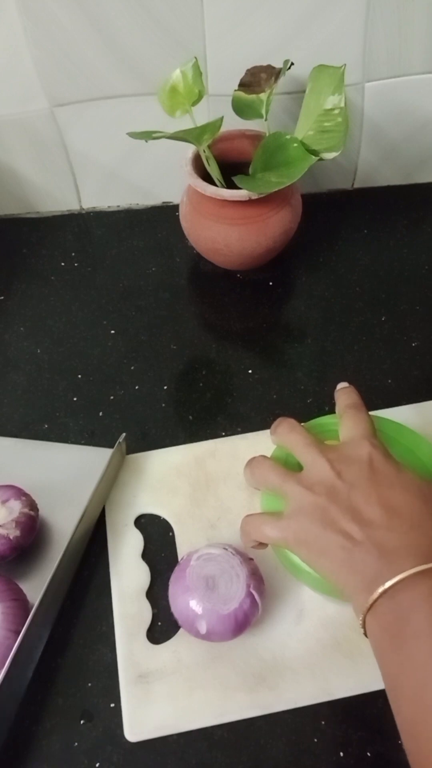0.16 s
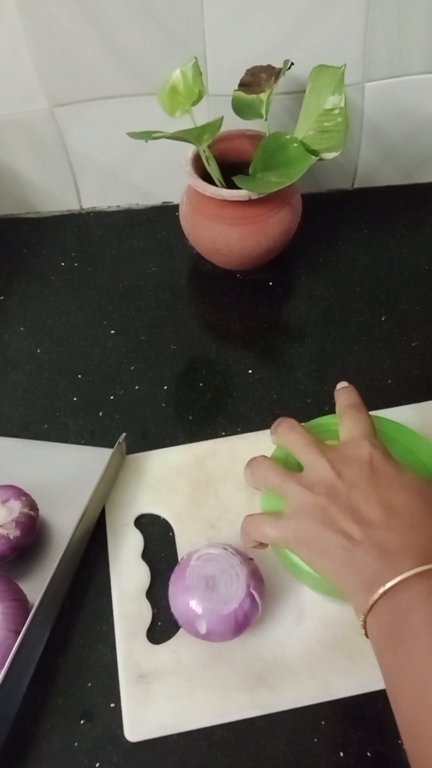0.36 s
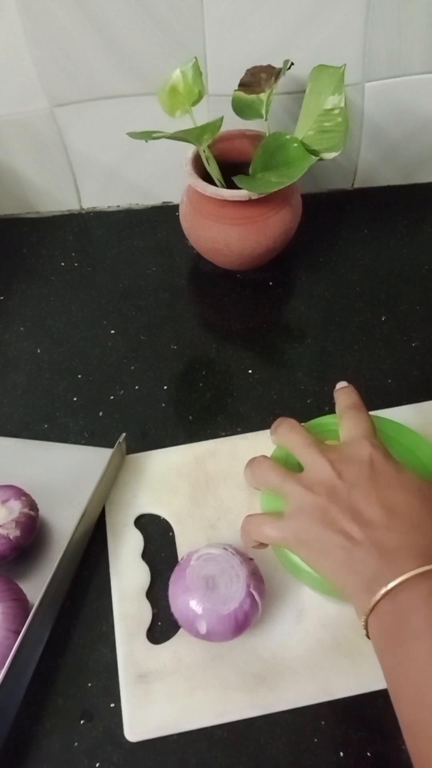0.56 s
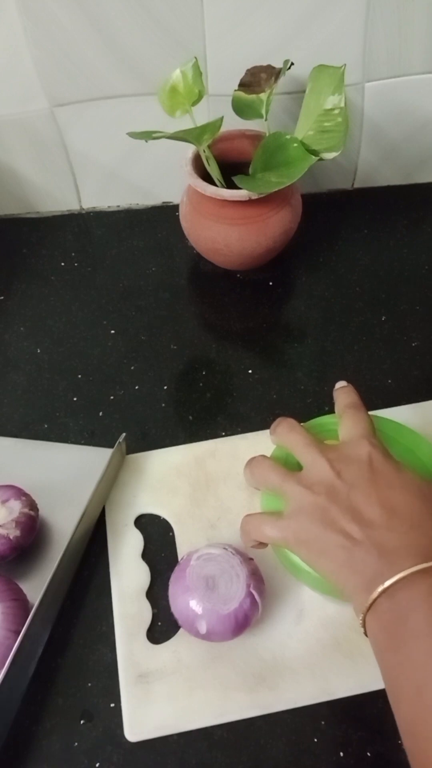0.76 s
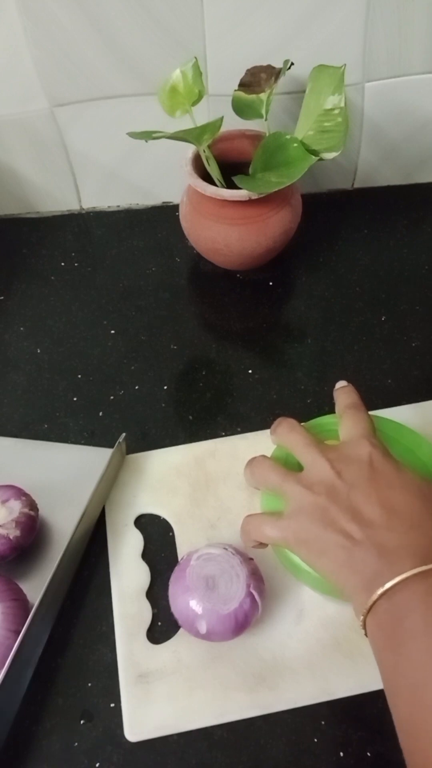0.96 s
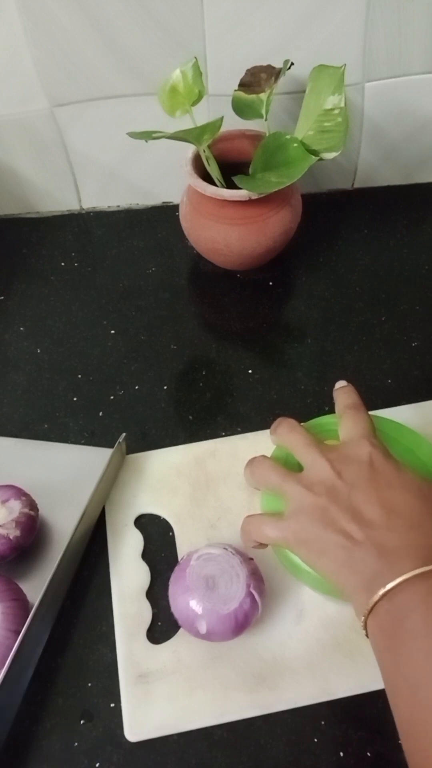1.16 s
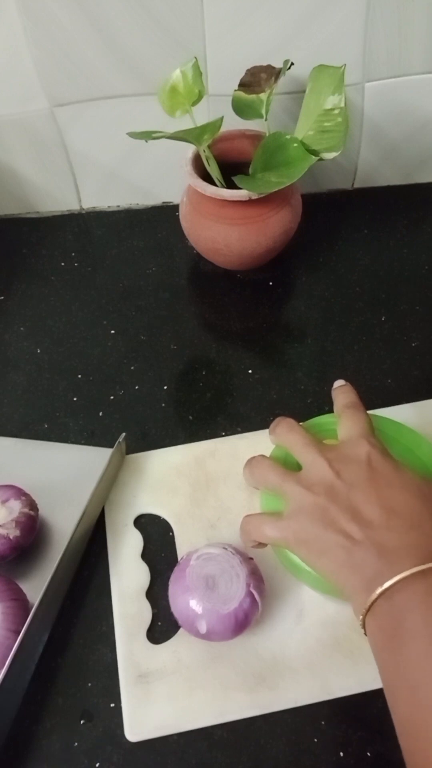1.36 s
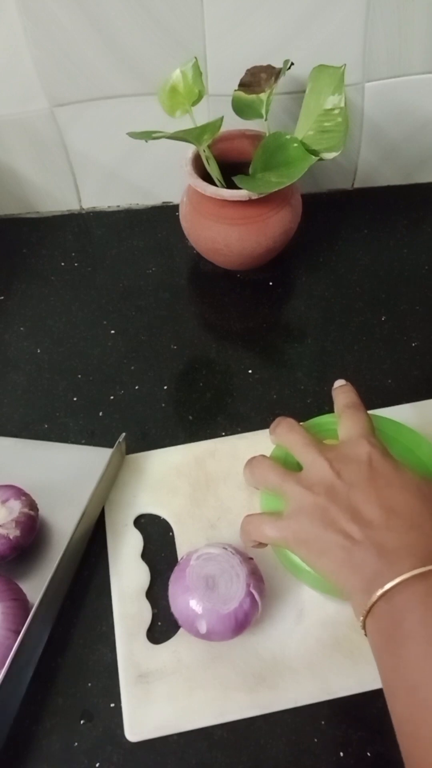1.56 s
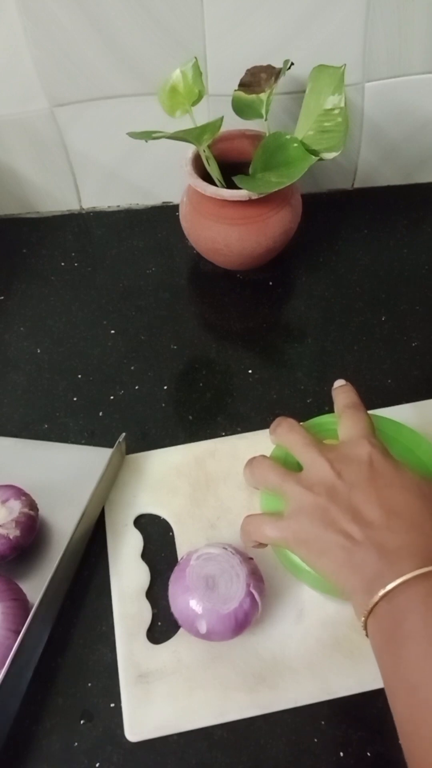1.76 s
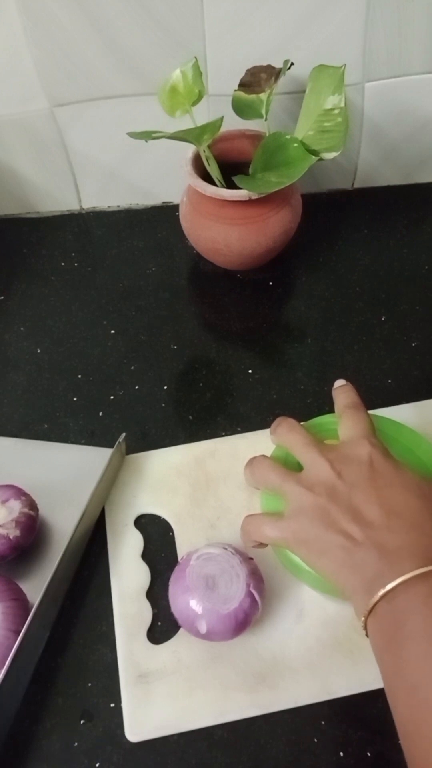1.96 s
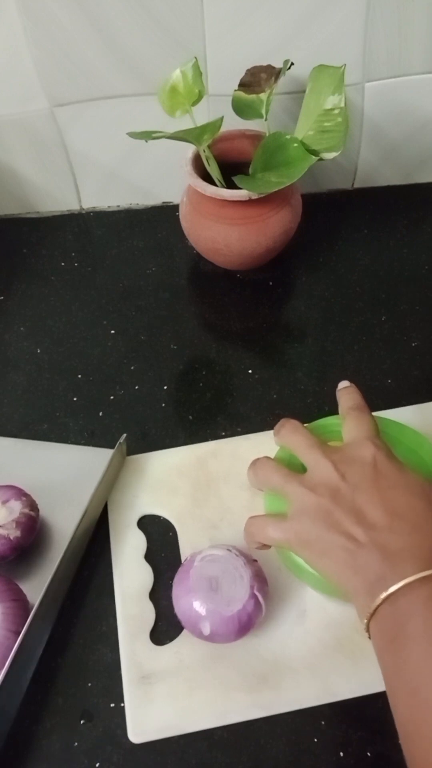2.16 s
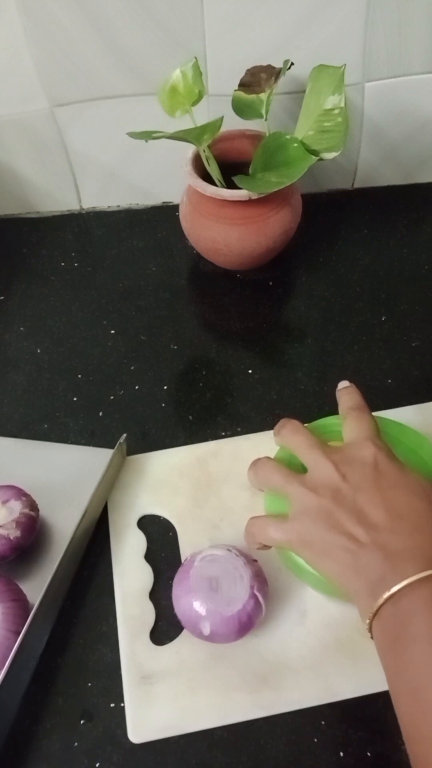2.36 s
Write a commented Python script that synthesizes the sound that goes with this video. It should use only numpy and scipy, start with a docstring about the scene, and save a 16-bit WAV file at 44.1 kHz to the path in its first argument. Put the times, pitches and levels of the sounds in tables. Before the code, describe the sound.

A pull-cord vegetable chopper crunches through onion four times in a steady rhythm. Each pull starts with a clack, pieces rattle against the plastic bowl, then the cord hisses back in. It sounds close, in a quiet kitchen.

```python
"""Bursts of crunching and rattling, one every 0.6 s: a pull-cord vegetable chopper in a tiled kitchen.
The drive catches with a clack, the blades spin up and fling onion pieces against the plastic bowl,
then the spring draws the cord back in with a hiss while the blades run down.
The chopper bumps softly on its board, over faint room noise."""
import sys
import numpy as np
from scipy import signal
from scipy.fft import rfft, irfft
from scipy.io import wavfile

SR = 44100
rng = np.random.default_rng(int(sys.argv[2]) if len(sys.argv) > 2 else 0)


def store_pcm(level_fs):
    """Save levels as 16-bit WAV."""
    pcm = np.round(np.clip(level_fs, -1, 1) * 32767).astype(np.int16)
    wavfile.write(sys.argv[1], SR, np.atleast_2d(pcm).T)


N = 110250
T = np.arange(N) / SR

# Each row: pull start in s, pull level in dB, pull length as a share of the usual,
# cord return level in dB, wait until the return in s, rise of the return in s.
STROKES = [(-.45, -4, 1.03, 1.5, 0.32, .02), (0.149, -1, 0.99, -1, 0.34, .002),
           (0.759, .5, 1.03, 3.5, 0.31, 0.024), (1.359, 0, 0.97, 2, 0.32, .002),
           (1.959, -2.5, 0.99, -2, 0.31, 0.055)]
# Spectra of a knock on plastic and of cord friction. Each row: frequency in Hz, relative level in dB.
KNOCK_SPECTRUM = [(30, -34), (55, -35), (95, -24.5), (125, -14.5), (180, -9.5), (350, -4), (750, 1),
                  (1500, -2.5), (2200, -10.5), (3000, -13), (3750, -17.5), (4300, -32), (4850, -37.5),
                  (7000, -35.5), (15500, -55.5)]
CORD_SPECTRUM = [(60, -23), (150, -5), (400, 3.5), (750, 1), (1250, 2), (1700, 4), (2300, -0.5),
                 (3200, -0.5), (4000, -10), (4950, -22.5), (6000, -10), (7400, 1), (8500, -0.5), (9300, -6),
                 (10900, -2), (13000, -10.5), (14000, -12), (15500, -9.5)]


def chopping():
    """Onion is cut and pelts the wall in bursts as the blades pass, over a swirl of wet mince."""
    # Force through one pull. Each row: time into the pull in s, level in dB.
    pull_shape = [(0, -19.5), (.035, -16), (.07, -7.5), (.105, -7), (.135, -2), (.205, -6), (.26, -12),
                  (.31, -19.5), (.40, -24), (.52, -25.5), (.58, -36)]
    # Big pieces hit the wall. Each row: time in s, relative level in dB.
    wall_knocks = [(.257, -1.5), (.278, -4.5), (.298, -2.5), (.345, -4), (.366, -8), (.813, -9),
                   (.828, -10), (.864, -2), (.881, -7.5), (.889, -7.5), (.898, 0), (1.425, -6),
                   (1.471, -6.5), (1.490, -6), (1.506, -5), (1.548, -6.5), (2.031, -13.5), (2.051, -7.5),
                   (2.097, -6.5), (2.131, -4.5), (2.150, -9.5)]
    # Each row: frequency in Hz, relative level in dB.
    crunch_spectrum = [(1000, -28), (3500, -4.5), (4500, -12), (4900, -8), (5600, 0.5), (7100, 9.5),
                       (8600, 1.5), (9300, -1), (10200, 1.5), (14000, -10.5), (15500, -6)]
    blade_hz, blade_depth = 49, 0.32
    force = sum(from_db(db) * gesture(pull_shape, s, stretch) for s, db, stretch, *_ in STROKES)
    passes = 1 + blade_depth * np.sin(2 * np.pi * (blade_hz * T + rng.random()))
    pieces = from_db(-34.5) * force * passes * grains(per_s=700, spread_db=4)
    mince = from_db(-36) * force ** 0.93 * rng.standard_normal(N)
    hits = kitchen(pieces + mince)
    knocks = kitchen(from_db(-4.5) * bursts(wall_knocks, decay_s=0.0031))
    # Faster blades cut more crisply; onion layers snap mostly at full speed.
    cuts = from_db(-17.5) * (hits + from_db(0.5) * knocks) * force ** 0.1
    snaps = kitchen(from_db(-53.5) * force ** 1.7 * grains(per_s=150, spread_db=9))
    return bowl(hits + knocks) + colour(cuts + snaps, crunch_spectrum)


def pawl():
    """The drive's pawl catches with a tick, knocks the bowl and rebounds once."""
    # Each row: time in s, knock level in dB.
    catches = [(0.149, -23), (0.756, -26), (1.361, -13), (1.960, -17.5)]
    rebound_s, rebound_db, tick_db = 0.005, -2.5, -31
    rebounds = [(s + rebound_s, db + rebound_db) for s, db in catches]
    hits = bursts(catches + rebounds, decay_s=0.0024)
    ticks = bursts([(s, tick_db) for s, _ in catches], decay_s=0.003)
    return bowl(kitchen(hits)) + colour(kitchen(ticks), CORD_SPECTRUM)


def bowl(hits):
    """Each hit gives a short plastic knock and rings the modes with strengths of its own."""
    # Modes of bowl and board. Each row: frequency in Hz, relative level in dB, T60 in s.
    modes = [(264, -17, .22), (413, -10, .1), (555, -8, .1), (608, -4, .11), (735, 0, .13), (840, -2, .06),
             (1042, -2, .07), (1239, -4, .1), (1508, -5, .1), (1553, -2, .11), (1645, -2, .05),
             (1880, -6, .045), (2680, -11, .04)]
    ring_db, scatter_db = -36, 2.5
    rings = np.zeros(N)
    for hz, db, t60_s in modes:
        strength = from_db(ring_db + db + scatter_db * rng.standard_normal(N))
        rings += ring(hits * strength, hz, t60_s)
    return colour(hits, KNOCK_SPECTRUM) + butterworth(rings, "high", hz=345, order=2)


def cord():
    """The cord rubs through its eyelet as the spring winds it back, rasping where it snags."""
    # Cord speed. Each row: time into the return in s, level in dB.
    return_shape = [(0, -10), (.05, -5.5), (.11, -2), (.19, -6), (.23, -16.5), (.27, -17), (.34, -16.5)]
    # Each row: centre in s, Gaussian width in s, level in dB.
    snags = [(0.038, .008, -48), (0.485, .002, -52), (0.514, 0.0022, -47), (0.587, 0.0069, -45),
             (1.192, 0.007, -46), (1.252, 0.013, -48), (1.691, 0.0033, -55), (1.792, 0.0058, -39),
             (2.419, 0.018, -48.5)]
    speed = sum(from_db(db) * gesture(return_shape, s + wait_s, rise_s=rise_s)
                for s, _, _, db, wait_s, rise_s in STROKES)
    snagging = sum(from_db(db) * np.exp(-0.5 * ((T - s) / width_s) ** 2) for s, width_s, db in snags)
    rub = from_db(-48) * speed * grains(per_s=5000, spread_db=3)
    rasp = snagging * grains(per_s=1500, spread_db=-1)
    hiss = colour(kitchen(rub + from_db(-4) * rasp), CORD_SPECTRUM)
    return hiss + colour(from_db(-5) * rasp, KNOCK_SPECTRUM)


def board():
    """The chopper rocks on the board with a low bump."""
    # Each row: time in s, level in dB.
    bumps = [(.895, -77), (1.361, -55), (2.15, -62)]
    impulses = np.zeros(N)
    for s, db in bumps:
        impulses[int(s * SR)] += from_db(db)
    return ring(impulses, hz=71, t60_s=0.064)


def kitchen(hits, spots=6):
    """Adds reflections from counter and tiles; each hit takes the echoes of one spot on the bowl."""
    t60_s, wall_delay_s, echo_db = 0.15, 0.00089, -1.5
    spot = rng.integers(0, spots, N)
    fade = (from_db(-60 * T / t60_s) * (T > wall_delay_s))[:N // 6]
    echoes = np.zeros(N)
    for k in range(spots):
        response = unit_energy(rng.standard_normal(len(fade)) * fade)
        echoes += signal.fftconvolve(hits * (spot == k), response)[:N]
    return hits + from_db(echo_db) * butterworth(echoes, "low", hz=11800, order=1)


def room_air():
    """Faint steady noise of the room."""
    # Each row: frequency in Hz, relative level in dB.
    air_spectrum = [(30, -38), (100, -3), (300, -3.5), (900, -5), (2000, 0), (3400, -13), (4900, -26),
                    (7400, -26), (15500, -23)]
    return from_db(-65) * colour(rng.standard_normal(N), air_spectrum)


def gesture(shape, start_s, stretch=1, rise_s=0.0011):
    """Gain of an (s, dB) shape that fades in at start_s, stretched in time."""
    s, db = np.transpose(shape)
    since_s = T - start_s
    gate = np.clip(since_s / rise_s, 0, 1) * (since_s < s[-1] * stretch)
    return from_db(np.interp(since_s / stretch, s, db)) * gate


def grains(per_s, spread_db):
    """Random clicks of uneven size; rms 1."""
    sizes = from_db(spread_db * np.minimum(rng.exponential(1, N), 3))
    signs = rng.choice([-1, 1], N)
    occurs = rng.random(N) < per_s / SR
    return unit_energy(sizes * signs * occurs) * np.sqrt(N)


def bursts(rows, decay_s, size=1024):
    """One brief decaying noise burst for each (s, dB)."""
    out = np.zeros(N + size)
    fade = np.exp(-T[:size] / decay_s)
    for s, db in rows:
        start = int(s * SR)
        out[start:start + size] += from_db(db) * unit_energy(fade * rng.standard_normal(size))
    return out[:N]


def ring(hits, hz, t60_s):
    """One mode: a unit click starts a decaying sine of height 1."""
    radius = from_db(-60 / (t60_s * SR))
    angle = 2 * np.pi * hz / SR
    return signal.lfilter([0, np.sin(angle)], [1, -2 * radius * np.cos(angle), radius ** 2], hits + 1e-18)


def colour(x, spectrum, size=4096):
    """Minimum-phase filter of unit energy with the given (Hz, dB) spectrum."""
    hz, db = np.transpose(spectrum)
    grid_hz = np.maximum(np.fft.rfftfreq(size, 1 / SR), 1)
    gain = from_db(np.interp(np.log(grid_hz), np.log(hz), db))
    cepstrum = irfft(np.log(gain))
    cepstrum[size // 2:] = 0
    response = irfft(np.exp(rfft(2 * cepstrum)))
    return signal.fftconvolve(x, unit_energy(response))[:N]


def butterworth(x, kind, hz, order):
    """Causal high-pass or low-pass."""
    return signal.sosfilt(signal.butter(order, hz, kind, fs=SR, output="sos"), x)


def from_db(db):
    """Decibels to gain."""
    return 10 ** (np.asarray(db) / 20)


def unit_energy(x):
    """Scale to an energy of one."""
    return x / np.sqrt(np.sum(x ** 2) + 1e-20)


def scene():
    """The chopper on its board in the room; mono."""
    return (room_air() + pawl() + chopping() + cord() + board())[None]


def record(dry):
    """The phone microphone loses the deep bass, has a notch in the treble and a steep top cut."""
    notch_hz, notch_q, cutoff_hz = 4965, 14.6, 15750
    thin = butterworth(dry, "high", hz=59, order=2)
    notched = signal.lfilter(*signal.iirnotch(notch_hz, notch_q, fs=SR), thin)
    top_cut = signal.ellip(12, 0.1, 80, cutoff_hz, fs=SR, output="sos")
    return signal.sosfilt(top_cut, 0.3 * thin + 0.7 * notched)


dry = scene()
out = record(dry)
store_pcm(out)
```